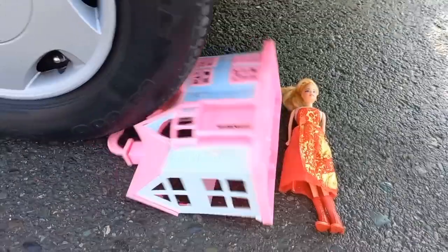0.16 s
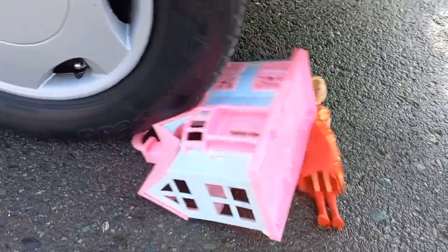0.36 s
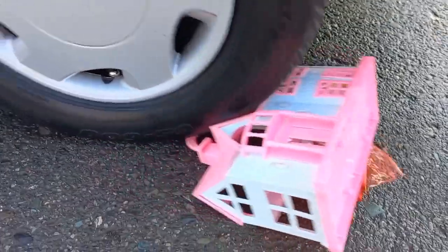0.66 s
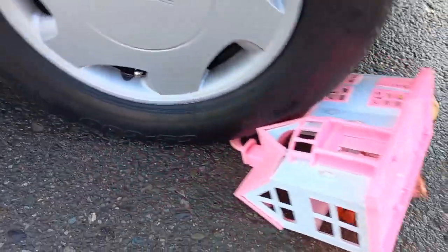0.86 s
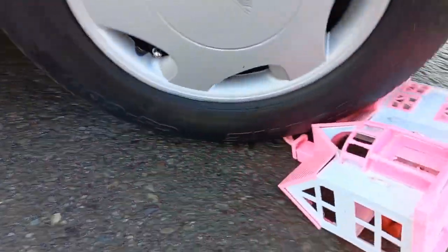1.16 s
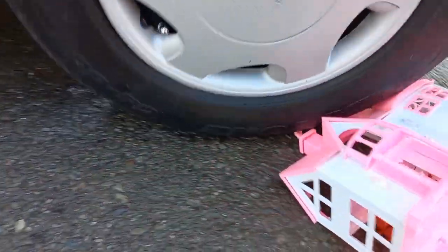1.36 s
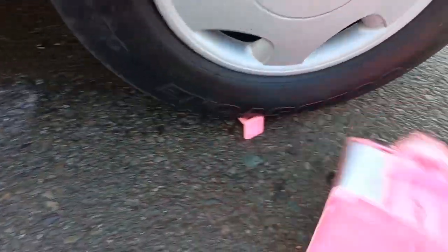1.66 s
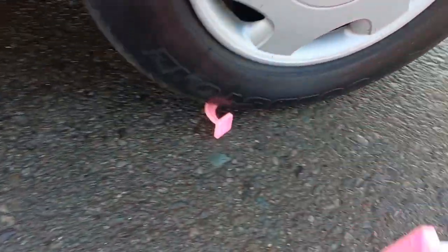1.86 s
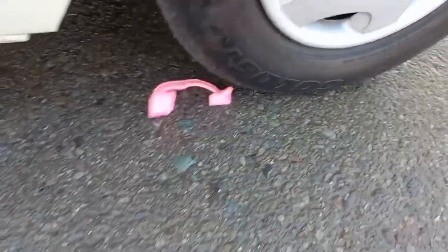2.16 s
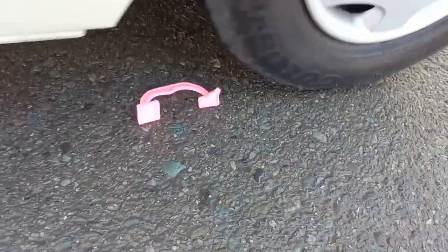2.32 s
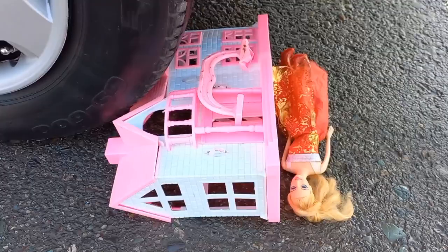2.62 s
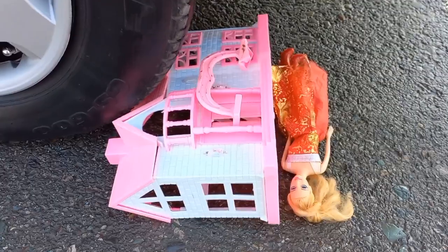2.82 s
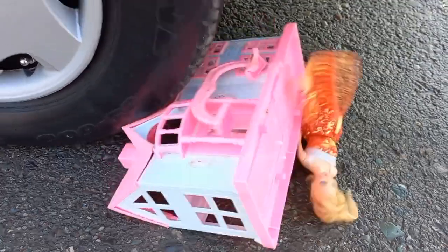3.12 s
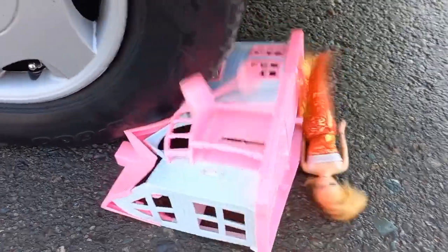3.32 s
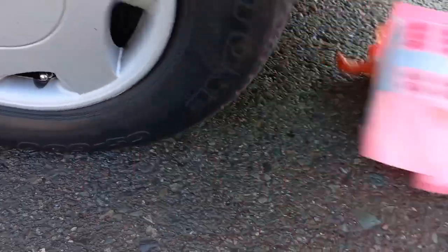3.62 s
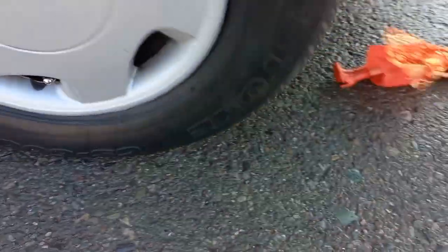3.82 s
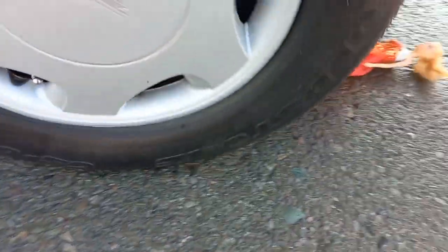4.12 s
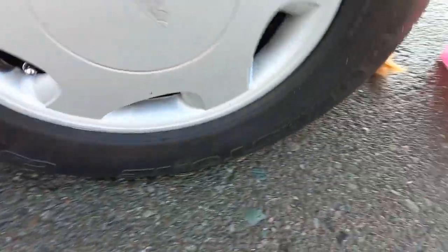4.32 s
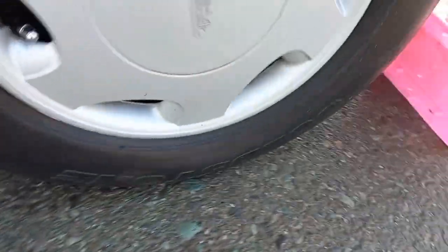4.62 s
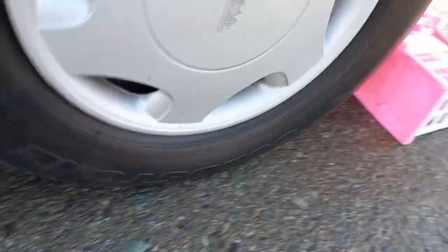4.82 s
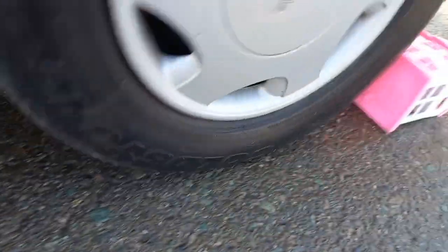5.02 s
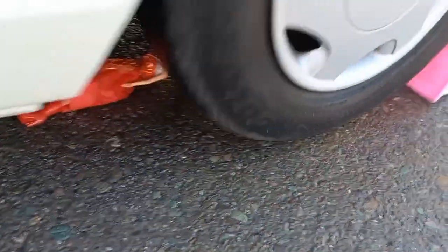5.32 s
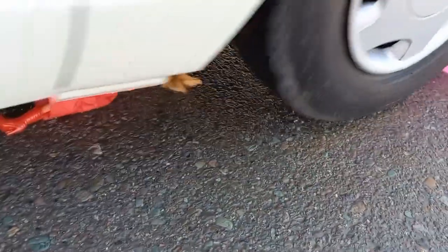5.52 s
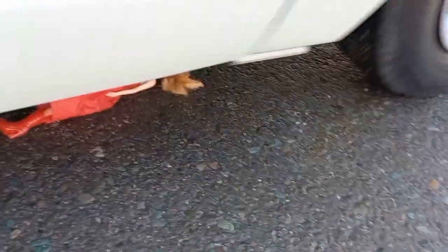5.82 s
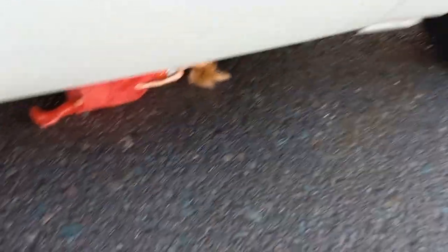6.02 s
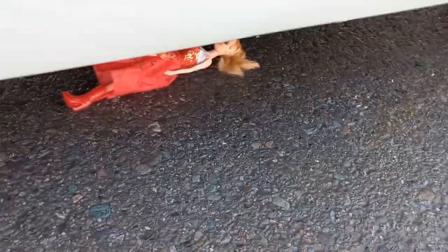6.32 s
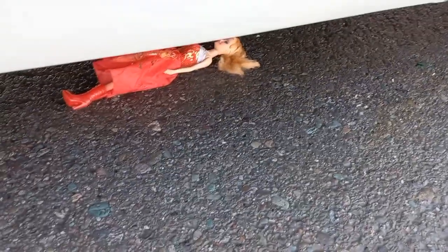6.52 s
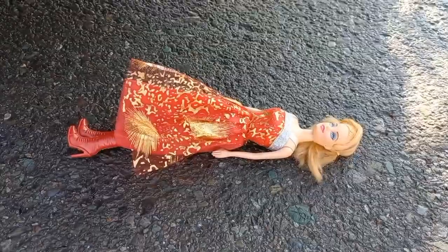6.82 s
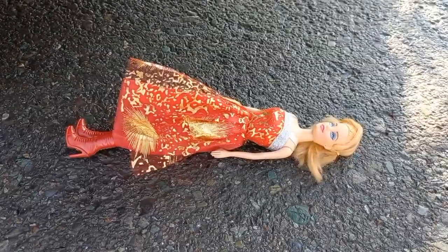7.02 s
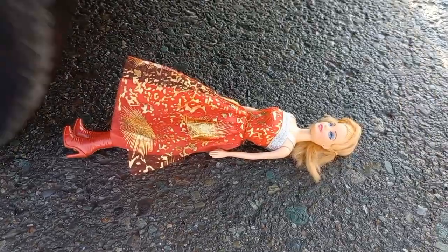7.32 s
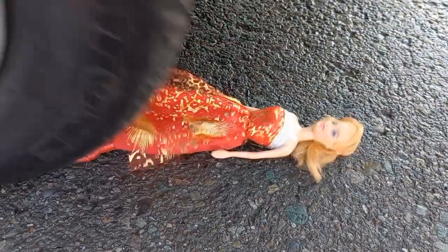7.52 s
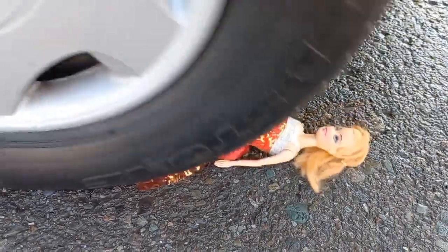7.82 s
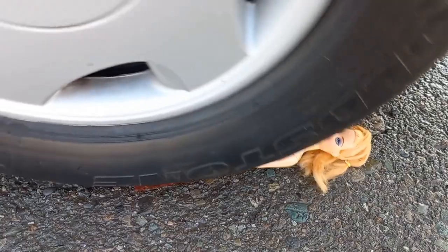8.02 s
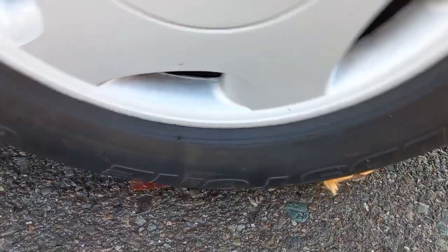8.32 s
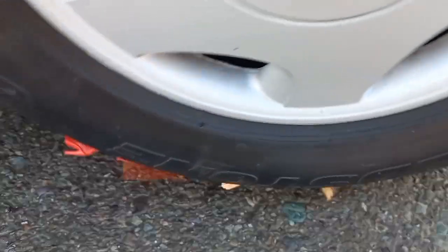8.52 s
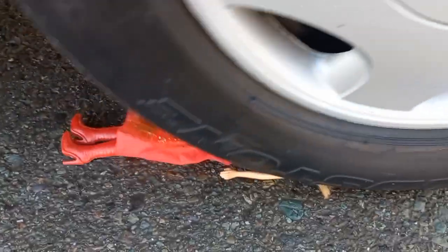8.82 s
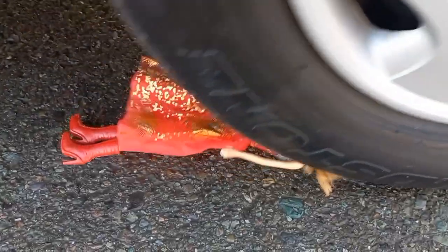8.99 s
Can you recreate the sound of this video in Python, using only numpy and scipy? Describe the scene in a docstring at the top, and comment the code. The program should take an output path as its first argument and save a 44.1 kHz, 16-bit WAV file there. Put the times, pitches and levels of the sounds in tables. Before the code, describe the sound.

A car tyre shoves a hollow plastic dollhouse along coarse asphalt outdoors, very close. Loud gritty scraping with sharp cracks and squeaky snaps fades to a short lull; a second squeeze crunches, skids away and goes quiet; a third hit grinds and knocks. Then fine ticking grit, and the tyre crushes a doll with dense brittle crackles over low booms. Stereo, slightly left, loudest peaks overloaded.

```python
"""Outdoors on rough asphalt: a car tyre shoves a hollow plastic toy house along, then crushes a doll, close by.
Scraping is noise pushed by random catches; cracks are sharp bursts of noise with a rattle and a short note.
Hollow resonances colour the plastic, and the tyre booms at three low pitches.
A faint outdoor hush lies beneath, and the loudest peaks overload the stereo input."""
import sys
import numpy as np
from scipy import signal
from scipy.fft import next_fast_len
from scipy.io import wavfile
from scipy.ndimage import uniform_filter1d

SR = 44100
rng = np.random.default_rng(int(sys.argv[2]) if len(sys.argv) > 2 else 0)


def wav_record(signal):
    """Record a signal, one row per channel, as 16-bit PCM in the file named by sys.argv[1]."""
    frames = np.transpose(np.atleast_2d(signal))
    bounded = np.clip(frames, -1, 1)
    # unit amplitude maps onto the largest positive 16-bit level
    quanta = np.round(bounded * 32767).astype(np.int16)
    wavfile.write(sys.argv[1], SR, quanta)


N = 403713

# Plastic dragged on asphalt, one group of rows per shove or lull, before the random catches are added:
# (time [s], body 250-1500 Hz [dB], edge 1.5-5 kHz [dB], grit 5-16 kHz [dB])
SCRAPE_LEVELS = [
    [(0.0, -8, -15, -26), (0.13, -21, -19.5, -34), (0.298, -13.5, -14.5, -25.5), (0.43, -25.5, -19.5, -33)],
    [(0.44, -17, -12.5, -29), (0.54, -23.5, -18, -31), (0.72, -15, -9.5, -23), (1.16, -16, -12, -24.5),
     (1.334, -18, -13.5, -30.5), (1.6, -26, -21, -31)],
    [(1.6, -23, -15.5, -30), (1.802, -28.5, -29, -38), (1.936, -27, -22, -42), (1.976, -26, -34, -29),
     (2.062, -21, -23, -45), (2.11, -38, -38, -55)],
    [(2.115, -43, -44, -42), (2.193, -48, -56, -68), (2.315, -58, -55, -65), (2.407, -56, -45.5, -58),
     (2.733, -42.5, -43.5, -42.5), (2.8, -33, -38, -48)],
    [(2.8, -39, -38, -44), (2.898, -28, -30, -39.5), (3.014, -21, -20, -35), (3.082, -22.5, -16.5, -28.5),
     (3.156, -17, -19.5, -36), (3.23, -28, -24.5, -38)],
    [(3.235, -27, -27, -34), (3.291, -32, -30, -49), (3.415, -24.5, -14, -27), (3.539, -29, -25, -47),
     (3.6, -20.5, -20, -28)],
    [(3.752, -33.5, -22, -33.5), (3.842, -26, -15.5, -27), (3.912, -25.5, -18, -29.5),
     (3.98, -34, -23, -45), (4.102, -26.5, -29.5, -37), (4.15, -45, -31, -47)],
    [(4.155, -45, -44, -60), (4.259, -51, -46, -63), (4.381, -68, -59, -66), (4.625, -59, -53, -55),
     (4.787, -56, -52, -51.5), (4.97, -41.5, -53, -55)],
    [(4.975, -29, -33, -42), (5.029, -20.5, -24.5, -29), (5.149, -25, -30, -46), (5.437, -15, -21, -26),
     (5.605, -14, -20.5, -28.5), (5.67, -26, -24, -35)],
    [(5.68, -25, -29.5, -44), (5.76, -18, -25, -29), (5.948, -25, -28, -46), (6.206, -29.5, -27.5, -35.5),
     (6.354, -28, -29, -35.5), (6.45, -43, -31, -35)],
    [(6.45, -46, -35, -47), (6.586, -40, -33, -44), (6.862, -40.5, -30, -33.5),
     (6.988, -41.5, -23.5, -37.5), (7.5, -41, -27.5, -34)],
    [(7.5, -29, -22, -39), (7.674, -38.5, -26.5, -41.5), (7.846, -35, -26, -38.5), (8.122, -34, -20.5, -25),
     (8.232, -27, -21, -32), (8.34, -43, -27, -41)],
    [(8.36, -50, -47, -47), (8.432, -40, -39, -54), (8.538, -39, -36, -51), (8.72, -56, -45, -55),
     (8.9, -51, -32, -43), (9.154, -50, -44, -60)],
]
# Plastic cracking. The peak is a nominal size; body and grit are weights that share it out:
# (time [s], peak [dB], body [dB], grit [dB], nominal rattle time to fall 60 dB [s], note [Hz],
#  note level [dB above the nominal peak])
CRACK_EVENTS = [(0.16, -3, 3, -43, 0.13, 1530, -2), (0.224, 9, -9, -20, 0.12, 855, -17),
                (0.286, 6, 3, -12, 0.14, 750, -7.5), (0.377, 1, -20, -15, 0.071, 2350, -14),
                (0.444, 0.5, -13, -12, 0.12, 5170, 6), (0.478, 8, -6, -14, 0.085, 990, -14),
                (0.558, 0, -19, -10, 0.094, 2410, -6), (0.66, 1, 1, -7, 0.18, 1050, -14),
                (0.973, 7, -23, -19, 0.11, 2420, -6), (1.12, 1, -4, -19, 0.17, 2340, -3),
                (1.167, 6.5, -28, -17, 0.049, 2520, 0), (1.204, 3, -11, -27, 0.25, 526, -5),
                (1.322, 7, -28, -15, 0.037, 2500, 0), (1.342, 6, -16, -13, 0.041, 2180, 3.5),
                (1.378, 6, -15, -23, 0.19, 850, -14), (1.437, 6, -1, -5, 0.078, 693, -7),
                (1.508, 3.5, -7, -14, 0.077, 884, -16), (1.523, 3.5, -13, -15, 0.17, 485, -10),
                (1.551, 2, -12, -19, 0.085, 1426, -9), (1.612, -6, -17, -13, 0.19, 2260, -15),
                (1.692, -5, -7, -23, 0.085, 2230, -10), (1.694, 6, -15, -13, 0.18, 1990, -3),
                (1.794, -2, -7, -21, 0.19, 875, -16), (1.847, 10, -15.5, -19.5, 0.094, 923, -23),
                (1.898, 3, -19, -10.5, 0.076, 1950, -13), (1.927, -5, -10, -19, 0.16, 861, -13),
                (1.953, 1, -12.5, -22, 0.14, 830, -15), (2.047, -5.5, 0, -15, 0.26, 720, -12),
                (2.184, -9, -43, -11, 0.085, 4560, 14), (2.229, -25, -30, -18, 0.11, 5300, 7),
                (2.313, -17, -38, -17, 0.068, 3860, -2), (2.371, -20, -42, -14, 0.16, 4440, 9),
                (2.422, -23.5, -16, -18, 0.085, 1660, -8), (2.782, -20.5, -19, 3, 0.062, 593, -14),
                (2.835, -8.5, 4, -8, 0.15, 773, -18), (2.85, -13, -5, -13, 0.12, 770, -2),
                (2.863, -12.5, -9, -12, 0.11, 725, 0), (2.93, -8.5, -8, -35, 0.26, 717, -6),
                (2.971, 0, -10, -24, 0.2, 567, -6), (3.001, 3, 5, -34, 0.092, 670, -4),
                (3.034, 11.5, -4, -16, 0.078, 600, -7), (3.136, 2.5, -4, -15, 0.085, 713, -9),
                (3.185, 2, -8, -7, 0.072, 650, -3), (3.24, -0.5, -23, -22, 0.072, 4960, 1),
                (3.258, -1, -22, 2, 0.053, 5450, 1), (3.275, 0.5, -23, -24, 0.062, 649, -9),
                (3.314, 2.5, -15.5, -11.5, 0.12, 585, -10), (3.344, 3, -21.5, -15, 0.17, 5330, -4),
                (3.405, -1, -24, -1, 0.11, 2600, -21), (3.44, 6, -34, -11, 0.14, 4670, -1),
                (3.587, -3, -8, -31, 0.1, 886, -12), (3.631, 1, -16, -33, 0.26, 800, -8),
                (3.717, 8, -19, -17, 0.11, 700, -9), (3.959, -4, -10, -13, 0.2, 510, -12),
                (3.983, -1, -31, -19, 0.055, 500, -13), (4.009, -6, -9, -11, 0.26, 910, -21),
                (4.181, -41, -5, -5, 0.085, 920, -8), (4.194, -14, -42, -19, 0.04, 5200, -10),
                (4.282, -27, -32, -16, 0.092, 4000, -13), (4.305, -7.5, -34, -2, 0.044, 4030, -8),
                (4.333, -6.5, -41, 0.5, 0.062, 4580, -5), (4.373, -21.5, -30, -19, 0.18, 4420, -4),
                (4.98, 13, 7, -8.5, 0.079, 890, -8), (5.07, -4, -4, -8, 0.18, 600, -1),
                (5.145, -2.5, -3, -7, 0.24, 600, -1.5), (5.199, 0, 4, -1.5, 0.14, 622, -1.5),
                (5.251, -6, 9, -24, 0.085, 623, -3), (5.268, 4, 6, -9, 0.12, 686, -4),
                (5.421, -9, -16, -15, 0.069, 615, 2), (5.527, 2, -2.5, -9, 0.085, 950, -9),
                (5.599, 1, -5, -6, 0.18, 587, -3), (5.704, -27, 2, -29, 0.078, 980, -8),
                (5.807, 12, -2.5, -26, 0.095, 694, -8), (6.14, 1, 8, -24, 0.085, 670, -10),
                (6.238, 2.5, 8, -11, 0.085, 595, -8), (6.287, -4.5, -11, -3, 0.098, 660, -12),
                (6.351, -12, -7, -19, 0.16, 1520, 0), (6.374, -10.5, -20, -12, 0.069, 1950, 8),
                (6.465, -20, -27, -7, 0.076, 2050, 6), (6.498, -10.5, -37, -38, 0.085, 1920, -3),
                (6.542, -10, -37, -6, 0.053, 2030, -11), (6.576, -25, -7, -16, 0.057, 2440, 3),
                (6.601, -7, -12, -19, 0.091, 770, -13), (6.64, -10, -18, -15, 0.19, 3170, 0),
                (6.714, -15, -1, 0, 0.096, 506, -14), (6.744, -9, -12, 0, 0.057, 2210, -15),
                (6.775, -14.5, -18, -13, 0.11, 2130, -8), (6.791, -2.5, -18, -15.5, 0.15, 2000, -20),
                (6.927, -18, -25, 1, 0.056, 2000, -4), (6.967, -17.5, -20, 2, 0.076, 1070, -7),
                (7.019, -10.5, -33, 5, 0.15, 1905, 4.5), (7.169, -2.5, -33, -20, 0.051, 2480, -6),
                (7.208, -12, -22, -24, 0.061, 2600, -1), (7.235, -11, -16, -10, 0.049, 2580, 2),
                (7.442, -23, -27, -3, 0.085, 2270, -14), (7.486, -12, -16, -4, 0.23, 2560, -14),
                (7.534, -10.5, -2, -10, 0.069, 1780, -7), (7.552, -7, -3, -15, 0.14, 664, -5.5),
                (7.595, 5, -30, -22.5, 0.074, 4190, -7), (7.62, -1, -26, -22, 0.067, 4240, 3),
                (7.663, 0.5, -29, -14, 0.037, 3840, 1.5), (7.706, -21, -23, -6, 0.074, 3560, -8),
                (7.724, -10, -39, -1, 0.069, 3470, 6), (7.735, -6.5, -41, -8, 0.12, 3920, 7),
                (7.784, -7, -16.5, -18, 0.23, 2780, -6), (7.822, -2, -23, -8, 0.12, 3840, 2.5),
                (7.892, -19, -1, -5, 0.085, 650, 3), (7.926, 0.5, -5, 1, 0.059, 1040, -15),
                (7.96, 2.5, -17, -6, 0.048, 1770, -11), (7.985, -11, -23, -13, 0.067, 1760, -6),
                (7.998, 3.5, -16, -8, 0.047, 950, -17), (8.011, 3.5, -14, -23, 0.16, 1630, -13),
                (8.059, -0.5, -15, -12, 0.05, 1260, -15), (8.086, -1.5, -22, -14, 0.085, 4950, 5),
                (8.11, -1.5, -10, -6, 0.14, 550, -14), (8.142, 2, -13, -11, 0.2, 1255, -18),
                (8.177, 3.5, -3, -10, 0.038, 1170, -18), (8.193, -26, -8, -11, 0.078, 966, -8),
                (8.215, 0, -11, -8, 0.096, 936, -15), (8.258, -4.5, -22, -22, 0.077, 610, -9),
                (8.274, 0.5, -11, -12, 0.06, 934, -9), (8.285, 1.5, -19, -14, 0.073, 900, -17),
                (8.303, 4, -8, -4.5, 0.078, 1150, -12), (8.409, -3, -9, -9, 0.063, 1150, -8),
                (8.446, 1, -8.5, -9, 0.052, 958, -6.5), (8.535, -10, -22, 0, 0.037, 5540, -4),
                (8.55, -1.5, -19, -16, 0.04, 983, -5.5), (8.593, 3, -19.5, -12, 0.063, 956, -4),
                (8.716, -8.5, -20.5, -12.5, 0.08, 3600, -19), (8.792, 0.5, -31.5, -15.5, 0.061, 3530, -8),
                (8.853, -18, -27, -16, 0.085, 2580, -8), (8.976, -0.5, -23, 1.5, 0.048, 2100, -7),
                (9.023, -5.5, -17, -15, 0.044, 964, -18), (9.067, -11.5, -16, -45, 0.05, 1160, -9),
                (9.122, -23, -25, -16, 0.078, 2860, -2)]
# How alike left and right are in the plastic and the air: (frequency [Hz], likeness [0 to 1])
SIDE_LIKENESS = [(60, 1), (130, 1), (290, 0.93), (640, 0.79), (1400, 0.5), (3100, 0.59), (6800, 0.57),
                 (15000, 0.6)]
# How much louder the left is in the plastic, before its place is added: (frequency [Hz], left minus right [dB])
SIDE_BALANCE = [(60, 1.5), (110, 1.5), (200, 2.5), (380, -5), (700, -2), (1290, -4.5), (2380, -4.5),
                (4400, 0.5), (8120, 5), (15000, -6.5)]


def amp(db):
    """Turn decibels into a gain."""
    return np.exp(np.asarray(db) * (np.log(10) / 20))


def rms_one(x):
    """Scale a sound to an average (rms) level of 1."""
    return x / np.sqrt(np.mean(x ** 2) + 1e-20)


def in_time(rows):
    """Join the rows of a table by straight lines: one curve per column after the time."""
    s, *columns = np.transpose(rows)
    seconds = np.arange(N) / SR
    return np.array([np.interp(seconds, s, column) for column in columns])


def at_hz(points, hz):
    """Read a frequency table between its points, on a log-frequency axis."""
    table_hz, values = np.array(points).T
    return np.interp(np.log(hz), np.log(table_hz + 1), values)


def drift(rate_hz):
    """Smooth random wandering around 0 with spread 1; a higher rate wanders faster."""
    step = 20   # made at one value per 20 samples, then joined up
    r = np.exp(-2 * np.pi * rate_hz * step / SR)
    noise = rng.standard_normal(N // step + 2002)
    slow = signal.lfilter([1], [1, -2 * r, r * r], noise)[2000:]   # skip the start-up
    return np.interp(np.arange(N) / step, np.arange(len(slow)), rms_one(slow))


def resonance(x, hz, width_hz):
    """Ring at one pitch: a two-pole filter with gain 1 at its peak, at least 5 Hz wide."""
    r = np.exp(-np.pi * max(width_hz, 5) / SR)
    feed = np.array([1, 0, -1]) * (1 - r * r) / 2
    return signal.lfilter(feed, [1, -2 * r * np.cos(2 * np.pi * hz / SR), r * r], x)


def sides(pan_db):
    """Left and right gains that differ by pan_db, half of it on each side."""
    return amp(np.array([pan_db / 2, -pan_db / 2]))


def stereo(mid, side, alike):
    """Mix a part shared by both sides with a part that is opposite on the two sides."""
    alike = np.clip(alike, -.99, .99)
    opposed = side * np.array([[1], [-1]])
    return np.sqrt(1 + alike) * mid + np.sqrt(1 - alike) * opposed


def bands(low_hz):
    """Cut the range from low_hz to about 18 kHz into third-octave filters, each with its centre [Hz]."""
    edges = low_hz * 2 ** np.arange(0, np.log2(18000 / low_hz), 1 / 3)
    return [(signal.butter(2, [a, b], "band", fs=SR, output="sos"), np.sqrt(a * b))
            for a, b in zip(edges, edges[1:])]


def slips(per_s, spread_db, ring_s):
    """Stones catch the plastic: random catches of uneven size that die quickly, over steady rubbing."""
    size = amp(spread_db * np.minimum(rng.exponential(1, N), 4))
    catches = (rng.random(N) < per_s / SR) * size
    r = amp(-60 / (ring_s * SR))   # each catch falls 60 dB in ring_s
    steady = 4.4
    return rms_one(steady + signal.lfilter([1], [1, -r], catches))


def scrape_force():
    """Force of the dragging in body, edge and grit: it throbs as the toy sticks and slips."""
    # the toy lurches and grinds hard for a moment: (start [s], end [s], rise above the scrape [dB])
    lurches = [(0, 0.003, 16), (0.04, 0.123, 4.5), (0.285, 0.362, 7.5), (0.468, 0.543, 8.5),
               (0.553, 0.608, 7), (0.795, 0.812, 6.5), (0.928, 0.933, 4.5), (1.047, 1.072, 4.5),
               (1.25, 1.303, 9.5), (1.433, 1.458, 11.5), (1.693, 1.733, 11), (3.034, 3.08, 11.5),
               (3.121, 3.146, 5.5), (3.179, 3.206, 12), (3.408, 3.49, 6.5), (3.585, 3.597, 18),
               (3.646, 3.746, 10.5), (4.969, 5.016, 14), (5.077, 5.132, 10), (5.136, 5.172, 8.5),
               (5.178, 5.238, 10), (5.266, 5.316, 12), (5.581, 5.646, 7), (5.799, 5.845, 7),
               (5.855, 5.926, 8), (6.142, 6.206, 16.5), (6.233, 6.269, 8.5)]
    zone_db = in_time(np.vstack(SCRAPE_LEVELS))
    lurch_db = np.zeros(N)
    for start, end, db in lurches:
        lurch_db[round(start * SR):round(end * SR)] = db
    lurch_db = uniform_filter1d(lurch_db, size=350)   # soften the steps over 8 ms
    shared = slips(per_s=100, spread_db=3.0, ring_s=0.013) * amp(1.9 * drift(33) + lurch_db)
    # small splinters differ in colour, so each zone also has catches of its own
    own = np.array([slips(per_s=60, spread_db=8, ring_s=ring_s) for ring_s in (.03, .012, .006)])
    return amp(zone_db) * shared * own


def plastic():
    """Scraping and cracking shake the shell: noise follows their force, coloured band by band."""
    # colour of the plastic, only compared within a zone: (frequency [Hz], level [dB per Hz])
    spectrum = [(120, -33), (200, -5.5), (381, -2.5), (434, -5), (638, -1.5), (1730, -6), (2000, -6.5),
                (2410, -7.5), (3000, -6.5), (4940, -6.5), (5930, -16.5), (8420, -15), (9580, -21.5),
                (15200, -13), (16400, -35)]
    # middle of body, edge and grit: (frequency [Hz])
    zone_hz = [600, 2700, 9000]
    force = np.log(np.hypot(scrape_force(), crack_force()) + 1e-7)
    white, out = rng.standard_normal((2, 2, N)), np.zeros((2, N))
    white *= amp(5.38 * rng.standard_normal(N)) * 0.61   # uneven grains rather than smooth hiss
    bank = bands(220)
    hz = np.array([h for sos, h in bank])
    level = amp(at_hz(spectrum, hz)) * np.sqrt(hz)
    zone = np.digitize(hz, [1500, 5000])
    for k, (sos, h) in enumerate(bank):
        # blend the forces of the two nearest zones
        place = np.interp(np.log(h), np.log(zone_hz), [0, 1, 2])
        low = min(int(place), 1)
        gain = np.exp((1 + low - place) * force[low] + (place - low) * force[low + 1])
        gain = gain * amp(1.55 * drift(28))   # each band flickers by itself
        gain = gain * sides(at_hz(SIDE_BALANCE, h))[:, None]
        zone_total = np.sqrt(np.sum(level[zone == zone[k]] ** 2))
        share = level[k] / zone_total * np.sqrt(SR / h)   # this band's share of its zone
        noise = stereo(*white[k % 2], at_hz(SIDE_LIKENESS, h))   # neighbouring bands use different noise
        out += share * signal.sosfilt(sos, gain * noise)
    return out


def shell(x):
    """Whatever lies under the tyre adds its hollow resonances and thin panel modes."""
    # what lies under the tyre shifts or changes: (time [s])
    swaps = [0, .55, 1.25, 2.5, 3.55, 4.5, 6.42, 7.5, 9.2]
    # hollow resonances between those moments: (frequency [Hz], width [Hz], boost before wavering [dB])
    # groups: house gripped, pushed along, squeaking free, squeezed, sliding away, hit again; loose grit; doll
    hollows = [
        [(325, 57, 4), (820, 290, 2), (1660, 270, 6), (2350, 200, 7), (5400, 900, 4.5), (8000, 300, 8.5)],
        [(367, 105, 5.5), (890, 52, 5), (1680, 230, 7), (2410, 170, 9.5), (3400, 260, 4.5), (4950, 310, 10),
         (6550, 120, 6.5), (7980, 460, 7)],
        [(378, 95, 5), (840, 41, 4), (1860, 290, 2.5), (2230, 140, 6), (2500, 83, 5), (8170, 390, 6.5)],
        [(334, 34, 5), (677, 32, 9), (860, 22, 0), (2740, 710, 4), (4800, 900, 1), (8430, 420, 7.5)],
        [(322, 80, 0), (690, 36, 2), (867, 90, 8), (2580, 250, 3.5), (3280, 130, -2), (8600, 130, 12)],
        [(633, 18, 7), (960, 37, 4.5), (2000, 1600, 8), (3250, 30, 12), (6800, 83, -17), (8340, 800, 9)],
        [(1150, 130, 3), (2050, 270, 7), (2520, 210, 4), (8450, 370, 6.5)],
        [(980, 34, 3.5), (1150, 130, 5.5), (2210, 310, 1), (3880, 170, 4.5), (4620, 98, 6), (8460, 260, 6)],
    ]
    # a new random set of thin panel modes is drawn this often, so the colour keeps changing
    panel_redraw_s = .2
    out, hold = x.copy(), round(panel_redraw_s * SR)
    grip = drift(28)   # each hollow speaks more or less as the grip on the shell moves
    for start, end, modes in zip(swaps, swaps[1:], hollows):
        part = slice(round(start * SR), round(end * SR))
        for hz, width, db in modes:
            waver = amp(2.2 * np.roll(grip, round(7 * hz))[part])   # shifted so each hollow differs
            out[:, part] += (amp(db) - 1) * resonance(x[:, part] * waver, hz, width)
    for i in range(0, N, hold):
        piece = np.pad(x[:, i:i + hold], ((0, 0), (0, hold // 2)))[:, :N - i]   # room to ring out
        panel_hz = 280 * 2 ** (5 * rng.random(18))
        ringing = sum(0.55 * resonance(piece, hz, 15 + hz / 70) for hz in panel_hz)
        out[:, i:i + piece.shape[1]] += ringing
    return out


def air():
    """Distant outdoor hush: steady noise through every second third-octave band."""
    # colour of the hush, before its overall level is set: (frequency [Hz], level [dB])
    hush = [(15, -39), (25, 1), (82, 5.5), (301, -13), (373, 2), (560, -52), (1610, -12.5), (2160, -32.5),
            (8360, -33.5), (16000, -43)]
    white = rng.standard_normal((2, 2, N))
    out = np.zeros((2, N))
    for k, (sos, h) in enumerate(bands(40)[::2]):
        noise = stereo(*white[k % 2], at_hz(SIDE_LIKENESS, h))
        out += amp(at_hz(hush, h)) * signal.sosfilt(sos, noise)
    return amp(-40) * rms_one(out)


def shaking():
    """How hard each boom mode is driven: rolling and dragging below, jolts that swell and die on top."""
    # the tyre is jolted: (time of the crest [s], carcass [dB], air cavity [dB], tread knock [dB])
    thumps = [(0.019, -18, -13, -16), (0.289, -29, -16.5, -10), (0.329, -30, -36, -18),
              (0.479, -32, -17, -9), (0.663, -37, -24, -29), (0.758, -31, -21, -26), (0.903, -30, -37, -28),
              (0.963, -39, -16, -38), (1.182, -29, -25, -20), (1.282, -24, -23, -33),
              (1.467, -23, -19, -35), (1.546, -17, -22, -25), (1.586, -33, -22, -30),
              (1.646, -24, -26, -28), (1.701, -34, -26, -15.5), (2.834, -28, -37, -40),
              (2.95, -32, -32, -22.5), (2.993, -24, -15.5, -15), (3.048, -26, -19, -11.5),
              (3.093, -10.5, -15.5, -26), (3.188, -33, -34, -14), (3.337, -17.5, -28, -33),
              (3.377, -33, -21, -32), (3.422, -21, -21, -22.5), (4.734, -25, -41, -51),
              (5.019, -36, -13, -36), (5.093, -21, -29, -40), (5.193, -14, -31, -33),
              (5.283, -29, -27, -17.5), (5.323, -35, -21, -32), (5.423, -23, -33, -32),
              (5.483, -25, -27, -22), (5.547, -29, -32, -20), (5.602, -31, -25, -18),
              (5.647, -31, -21, -35), (5.805, -19, -29, -15), (6.156, -22, -22, -17),
              (6.704, -22, -28, -12.5), (6.844, -28, -37, -30.5), (7.004, -17.5, -43, -36),
              (7.104, -31, -29, -34), (7.144, -31, -36, -45), (7.308, -15.5, -43, -33),
              (7.533, -34, -34, -31), (7.571, -25, -8, -30), (7.828, -23, -17, -28), (7.888, -13, -9, -29),
              (7.95, -12.5, -13, -24), (8.042, -19, -26, -25), (8.176, -10, -14, -19),
              (8.329, -16.5, -16, -37), (8.46, -20, -24, -32)]
    # carcass rumble as the tyre rolls: (time [s], level [dB])
    roll = [(0.0, -29), (0.94, -36), (1.5, -33), (2.27, -45.5), (3.03, -25), (3.85, -43), (4.46, -49),
            (4.99, -40.5), (5.23, -34.5), (6.45, -31.5), (6.83, -27), (8.08, -26), (8.62, -52), (9.15, -52)]
    # air cavity and tread knock driven by the dragging: (level against the scrape body [dB])
    drag_shakes = [-11, -15]
    # swelling and dying of a jolt, time to 1/e of its level for each boom mode: (time [s])
    thump_rise = [0.026, 0.024, 0.013]
    thump_fall = [0.037, 0.026, 0.0093]
    drag_db = in_time(np.vstack(SCRAPE_LEVELS))[0]
    power = amp([*in_time(roll), *(drag_db + db for db in drag_shakes)]) ** 2
    t = np.arange(-SR // 8, SR // 4)   # samples around the crest
    rise = (t / SR / np.c_[thump_rise]) ** 2
    fall = t / SR / np.c_[thump_fall]
    swell = np.exp(-2 * np.where(t < 0, rise, fall))   # 2 because powers are added
    for s, *db in thumps:
        i = round(s * SR) + t
        inside = (i >= 0) & (i < N)
        power[:, i[inside]] += (amp(np.c_[db]) ** 2 * swell)[:, inside]
    return np.sqrt(power)


def boom():
    """The tyre carcass, air cavity and tread ring at three low pitches, shaken unevenly."""
    # carcass, air cavity, tread knock: (frequency [Hz], width of the first filter [Hz], left-right likeness [0 to 1])
    boom_modes = [(77, 28, .55), (134, 16, .9), (195, 50, .88)]
    out = 0
    for level, (hz, width, alike) in zip(shaking(), boom_modes):
        narrow = resonance(rng.standard_normal((2, N)), hz, width)
        mid, side = resonance(narrow, hz, 2.57 * width)
        swing = np.abs(signal.hilbert(mid, next_fast_len(N))[:N])
        mid = mid / (swing + 0.9 * mid.std())   # evened out: a steadily driven ring
        out = out + level * stereo(rms_one(mid), rms_one(side), alike)
    return out * sides(0.51)[:, None]


def crack_force():
    """Force of the cracks in body, edge and grit: each is a sharp snap and a longer rattle."""
    # part of the rattle time used in body, edge and grit: (share)
    rattle_share = [0.69, 1, 0.85]
    edge_db = -8   # weight of the edge, beside the body and grit columns
    out, t = np.zeros((3, N)), np.arange(SR // 6) / SR
    rebounds = rng.uniform(.01, 0.027, len(CRACK_EVENTS))   # seconds
    for (s, peak_db, body_db, grit_db, t60, *_), rebound in zip(CRACK_EVENTS, rebounds):
        i = round(s * SR)
        colour = amp([body_db, edge_db, grit_db])
        size = amp(peak_db - 7.0) * colour / np.sqrt(np.sum(colour ** 2))
        snap = 0.99 * amp(-60 * t / 0.0047)
        rattle = 0.67 * amp(-60 * t / np.clip(t60 * np.c_[rattle_share], .015, .2))
        # the piece springs back
        second_snap = 0.6 * (t > rebound) * amp(-60 * np.abs(t - rebound) / 0.0061)
        shape = snap + rattle + second_snap
        out[:, i:i + len(t)] += (size[:, None] * shape)[:, :N - i]
    return out


def notes():
    """Each crack also rings the broken piece: a pair of close, quickly damped tones."""
    low_note_t60_s = 0.054   # time to fall 60 dB, for notes up to 1200 Hz
    out, t = np.zeros((2, N)), np.arange(SR // 10) / SR
    chance = rng.random((len(CRACK_EVENTS), 3))
    for (s, peak_db, *_, hz, note_db), (turn, lag, split) in zip(CRACK_EVENTS, chance):
        i = round(s * SR)
        # high notes are further out of step between left and right
        out_of_step = np.array([[0], [hz / 2000 * (lag - .5)]])
        phase = 2 * np.pi * (hz * t + turn) + out_of_step
        pair = np.sin(phase) + .5 * np.sin(phase * (1.1 + .06 * split))
        t60 = low_note_t60_s * min(1, 1200 / hz)   # small pieces ring high and short
        shape = (1 - np.exp(-t / 0.00041)) * amp(-60 * t / t60)
        gain = amp(peak_db + note_db) * sides(at_hz(SIDE_BALANCE, hz))[:, None]
        out[:, i:i + len(t)] += (gain * pair * shape)[:, :N - i]
    return out


def wander(x):
    """The contact point moves, so the sound reaches one side a little before the other."""
    lag_spread_s = .0001   # typical left-right time difference
    lag = np.round(lag_spread_s * SR * drift(1.5) / 2).astype(int)
    left_at = np.clip(np.arange(N) - lag, 0, N - 1)
    right_at = np.clip(np.arange(N) + lag, 0, N - 1)
    return np.array([x[0, left_at], x[1, right_at]])


def scene():
    """Add up the plastic toys, the tyre boom and the outdoor air."""
    # where the breaking plastic lies: (time [s], left minus right [dB])
    plastic_place = [(0, 3.5), (1, 4.5), (2, 4), (2.6, 1.5), (3.2, 6), (4.2, 4.5), (5.2, 3.5), (6.3, 2),
                     (6.6, 1.5), (7.6, 1.5), (8.2, 2), (9.154, 3.5)]
    toys = shell(plastic()) + notes()
    return wander(toys * sides(in_time(plastic_place)[0])) + boom() + air()


def record(dry):
    """The input bends over fairly hard on loud peaks, then a steep filter removes the top treble."""
    hardness, ceiling, cutoff_hz = 4.04, 1.03, 15850
    clipped = dry / (1 + np.abs(dry / ceiling) ** hardness) ** (1 / hardness)
    top_cut = signal.ellip(8, .5, 50, cutoff_hz, fs=SR, output="sos")
    return np.clip(signal.sosfilt(top_cut, clipped), -1, 1)


dry = scene()
out = record(dry)
wav_record(out)
```